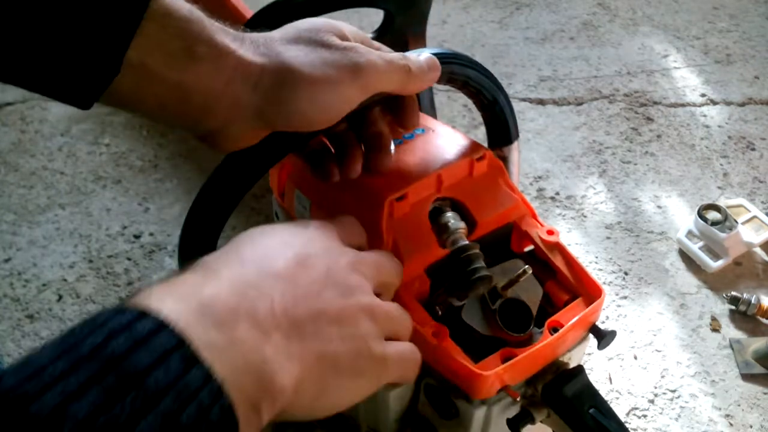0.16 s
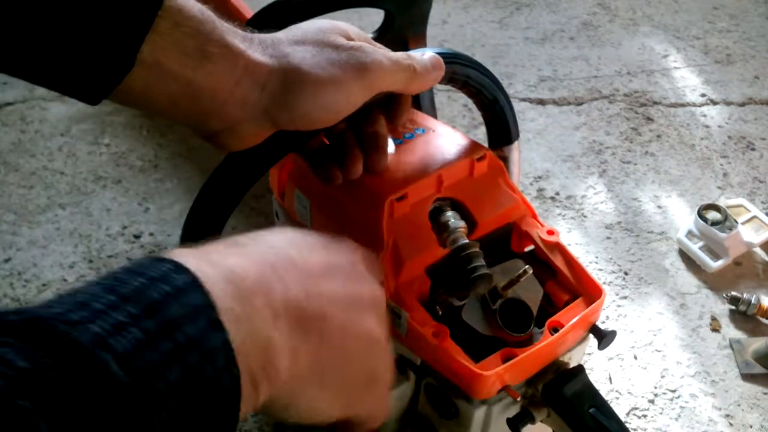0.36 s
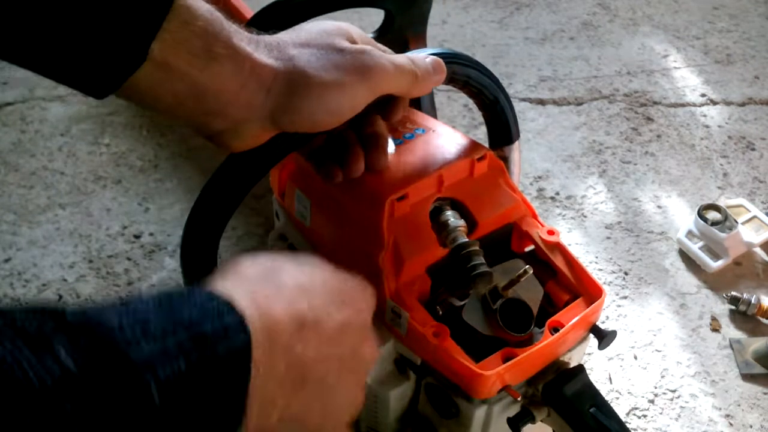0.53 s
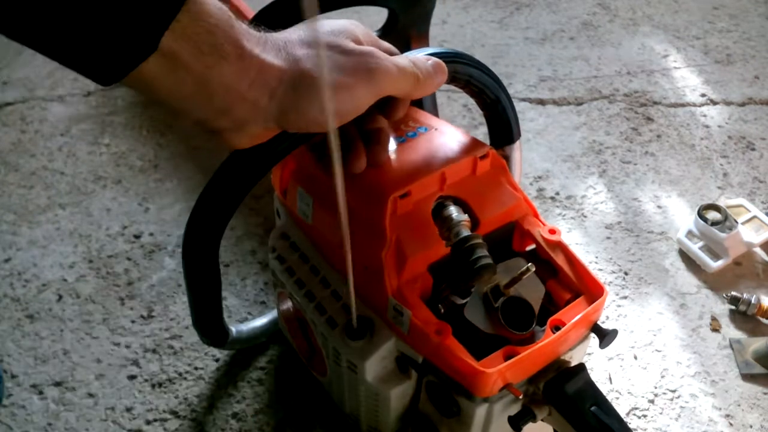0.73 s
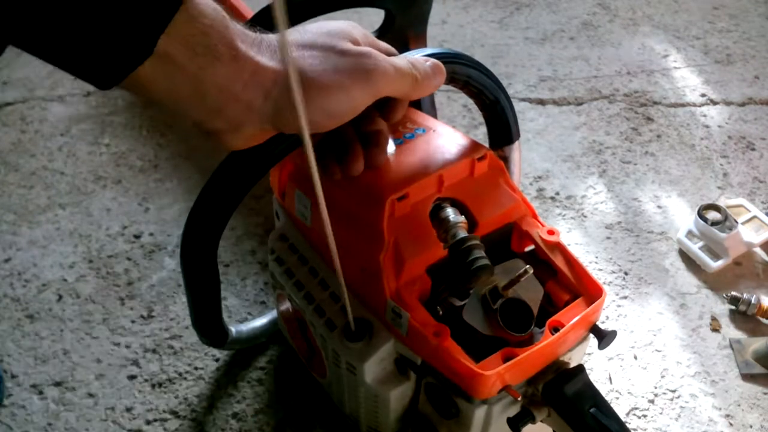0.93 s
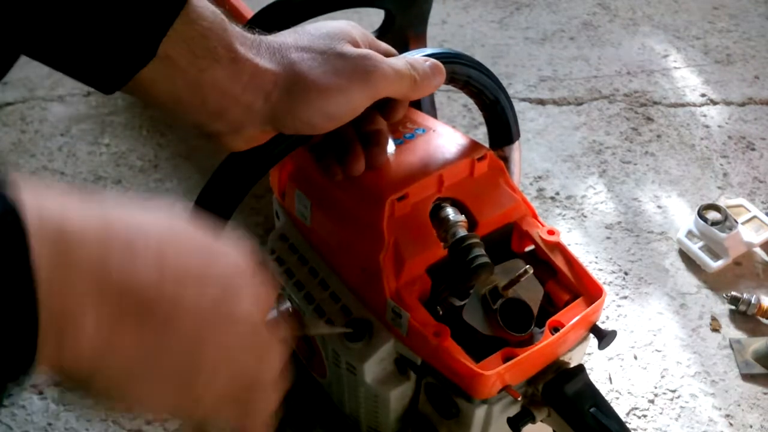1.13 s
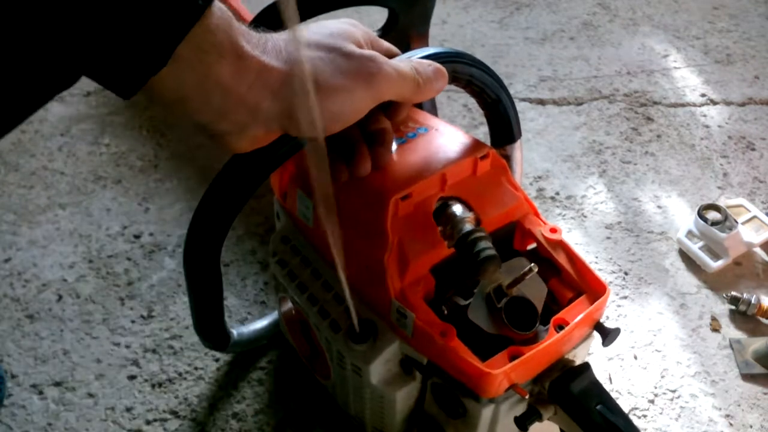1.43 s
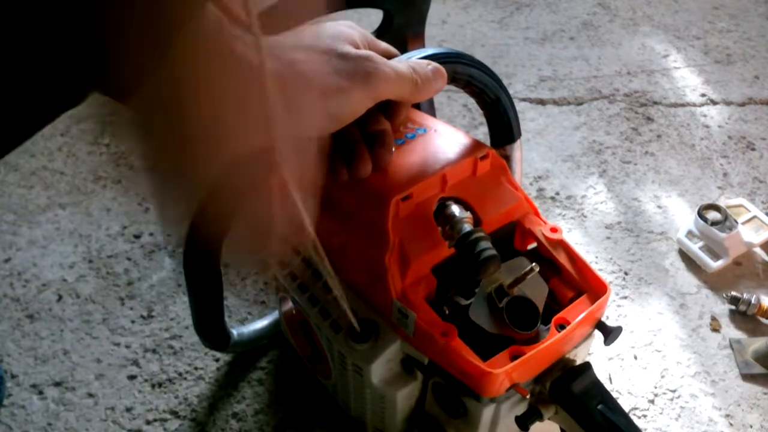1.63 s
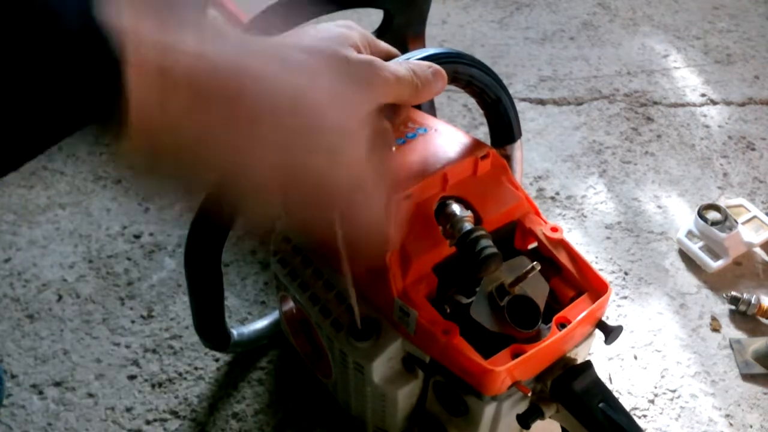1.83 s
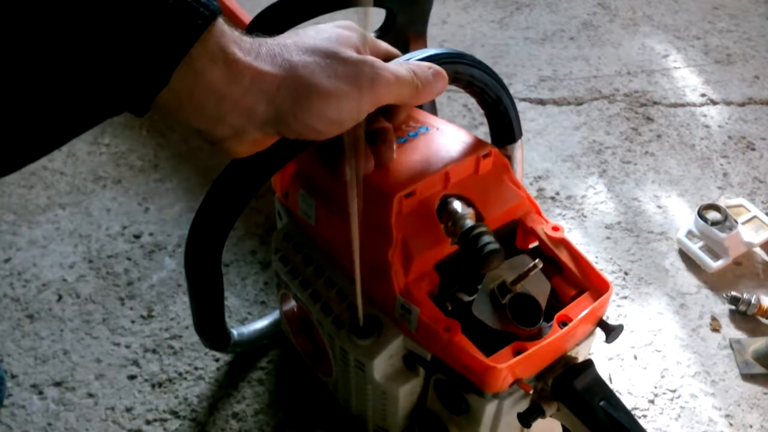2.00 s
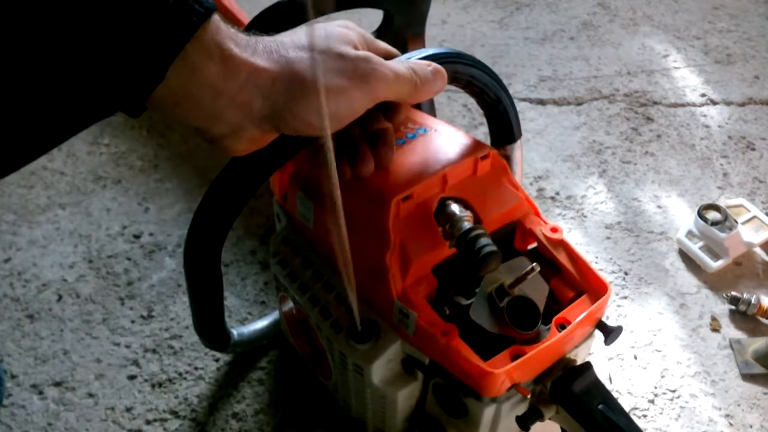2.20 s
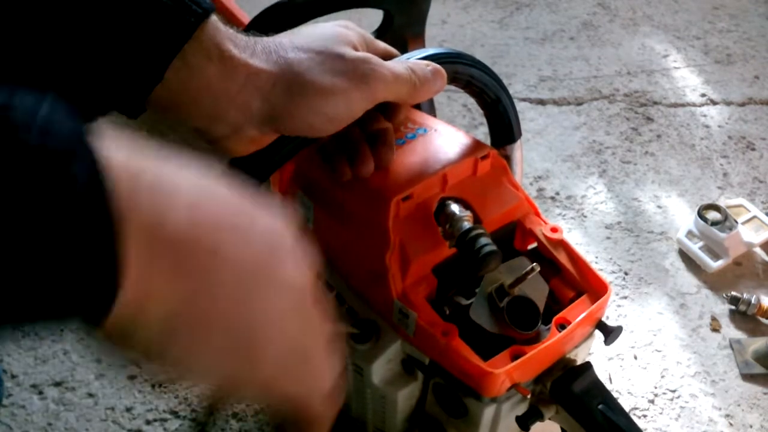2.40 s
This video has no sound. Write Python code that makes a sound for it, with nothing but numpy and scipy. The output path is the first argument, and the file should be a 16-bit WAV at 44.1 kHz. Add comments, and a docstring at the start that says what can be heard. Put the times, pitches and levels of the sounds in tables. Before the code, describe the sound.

Close up in a workshop, a hand grips a plastic saw case, then three fast cord pulls spin the engine with dull exhaust puffs, hollow knocks and hiss, ratchet ticks between them; it never starts.

```python
"""A hand takes hold of a small petrol saw in a workshop, scuffing and knocking its plastic case.
The starter cord is then pulled three times; the engine turns over without firing. The pawls first bite with a crack.
In each pull, gliding sines puff air through the silencer while ringing modes rattle and knock the case.
As the cord winds back, short bursts of impacts tick the pawls over the flywheel.
Coloured noise makes the scuffs, the cord and fan hiss, the low shake and the air; feedback delays make the room."""
import sys
import numpy as np
from scipy import signal
from scipy.fft import rfft, irfft, next_fast_len
from scipy.io import wavfile
from scipy.ndimage import uniform_filter1d

SR = 44100
rng = np.random.default_rng(int(sys.argv[2]) if len(sys.argv) > 2 else 0)


def put_to_file(sound):
    """Save the sound as 16-bit audio at rate SR, in the file named by the first command-line argument."""
    columns = np.atleast_2d(sound).T  # one column per channel
    safe = np.clip(columns, -1, 1)
    whole_steps = np.round(safe * 32767)
    wavfile.write(sys.argv[1], SR, whole_steps.astype(np.int16))


N = 112454


def from_db(db):
    """Amplitude factor of a level in dB."""
    return 10 ** (np.asarray(db) / 20)


def rms_one(x):
    """Scale to rms 1."""
    return x / np.sqrt(np.mean(x ** 2) + 1e-20)


def in_time(rows):
    """Table columns at every sample: -150 before the first row, the last value held after it."""
    s, *columns = np.transpose(rows)
    t = np.arange(N) / SR
    return [np.interp(t, s, c, left=-150, right=c[-1]) for c in columns]


def noise(spectrum):
    """Steady noise coloured by (pitch [Hz], level [dB per Hz]) points; rms 1."""
    hz = np.maximum(np.arange(N // 2 + 1) * SR / N, 1)
    points_hz, points_db = np.transpose(spectrum)
    gain = from_db(np.interp(np.log(hz), np.log(points_hz), points_db))
    return rms_one(irfft(rfft(rng.standard_normal(N)) * gain, N))


def flicker(rate_hz, depth_db):
    """A gain that wanders at random: low-passed noise, in dB."""
    r = np.exp(-2 * np.pi * rate_hz / SR)
    # the first second is dropped so the filter has settled
    slow = signal.lfilter([1], [1, -2 * r, r * r], rng.standard_normal(N + SR))[SR:]
    return from_db(depth_db * rms_one(slow))


def ring(clicks, hz, t60_s):
    """Two-pole resonator: a unit click starts a decaying sine of height 1."""
    r = from_db(-60 / (t60_s * SR))
    w = 2 * np.pi * hz / SR
    return signal.lfilter([0, np.sin(w)], [1, -2 * r * np.cos(w), r * r], clicks + 1e-18)


def impulses(s, db):
    """One click per time and level."""
    out = np.zeros(N)
    out[(np.asarray(s) * SR).astype(int)] = from_db(db)
    return out


def through(modes):
    """Broad colour that follows the modes and falls away on both sides."""
    return [(modes[0][0] / 3, -40)] + list(modes) + [(16000, modes[-1][1] - 30)]


def chatter(s, db, tilt_db, modes, t60_s, length_s, crack_db):
    """Each contact, a blow and a burst of tiny impacts, rings every mode by its own strength, and cracks."""
    t = np.arange(int(0.04 * SR)) / SR / length_s
    burst = (1 - np.exp(-8 * t)) * np.exp(-t)
    strength_db = db[:, None] + tilt_db + rng.normal(0, 2.5, (len(s), len(modes)))
    crack_envelope = signal.fftconvolve(impulses(s, db), burst)[:N]
    out = from_db(crack_db) * crack_envelope * noise(through(modes))
    for k, (hz, level_db) in enumerate(modes):
        blows = impulses(s, strength_db[:, k] + level_db)
        envelope = signal.fftconvolve(blows, burst)[:N]
        trail = envelope * rng.standard_normal(N) / np.sqrt(length_s * SR)
        out += (-1) ** k * ring(0.53 * blows + trail, hz, t60_s)
    low_cut = signal.butter(4, modes[0][0] * 0.78, "high", fs=SR, output="sos")
    return signal.sosfilt(low_cut, out)


# exhaust puffs, one a turn: (time [s], level [dB])
PUFFS = [(.8497, -19), (.9041, -18), (.9732, -25), (1.446, -19), (1.4969, -15), (1.5387, -15),
         (1.5841, -17.5), (1.6533, -26), (2.0922, -17), (2.1367, -13.5), (2.1725, -13.5), (2.2124, -15),
         (2.2665, -18.5)]
PUFF_START_HZ, PUFF_END_HZ, PUFF_GLIDE_S, PUFF_PEAK_S = 90, 350, .005, .005
ECHO_S, ECHO_DB = .016, -10


def puffs():
    """Each puff dips in pressure, then rings upward in pitch as the port opens; a wall returns it once."""
    t = np.arange(int(.04 * SR)) / SR
    hz = PUFF_END_HZ - (PUFF_END_HZ - PUFF_START_HZ) * np.exp(-t / PUFF_GLIDE_S)
    swell = (t / PUFF_PEAK_S * np.exp(1 - t / PUFF_PEAK_S)) ** 3
    puff = -swell * np.sin(2 * np.pi * np.cumsum(hz) / SR)
    direct = signal.fftconvolve(impulses(*np.transpose(PUFFS)), puff)[:N]
    echo = np.pad(direct, (int(ECHO_S * SR), 0))[:N]
    return direct + from_db(ECHO_DB) * echo


PORT_HZ, PORT_DB, PORT_LEAD_S = 990, -5, 0.002836  # level relative to the puff


def port():
    """The exhaust port rings as it opens, just ahead of each puff."""
    s, db = np.transpose(PUFFS)
    return ring(impulses(s - PORT_LEAD_S, db + PORT_DB), PORT_HZ, CASE_T60_S)


# knocks on the case, and two pawl ticks near 3.5 kHz, at 1.212 and 1.238 s:
# (time [s], level [dB], pitch that rings most [Hz])
KNOCKS_AND_PITCHED_TICKS = [(0.1359, -25.5, 1110), (0.4165, -34.5, 880), (0.7828, -16, 1790),
                            (0.827, -15, 1570), (0.8857, -13, 1600), (0.9459, -12, 1850),
                            (1.2119, -15.5, 3460), (1.238, -16.5, 3500), (1.351, -22.5, 974),
                            (1.419, -19, 1520), (1.483, -8, 1920), (1.628, -9, 1250), (2.025, -16.5, 1460),
                            (2.069, -13, 1570), (2.125, -38, 1040), (2.248, -20, 1550),
                            (2.262, -13.5, 1660)]
# modes of the plastic case: (pitch [Hz], level [dB])
CASE = [(600, -9), (810, -7), (1050, -3), (1250, -6), (1570, -3), (2120, -6.5), (2750, -17), (3460, -16.5),
        (4990, -17.5)]
CASE_T60_S = .022
KNOCK_S, KNOCK_FOCUS_DB_PER_OCT, KNOCK_CRACK_DB = 0.0042, 19, -22


def knocks_and_pitched_ticks():
    """Case modes near the pitch of each knock, or of the two pawl ticks, ring most."""
    s, db, pitch_hz = np.transpose(KNOCKS_AND_PITCHED_TICKS)
    octaves_off = np.abs(np.log2(pitch_hz[:, None] / np.array(CASE)[:, 0]))
    tilt_db = -KNOCK_FOCUS_DB_PER_OCT * octaves_off
    return chatter(s, db, tilt_db, CASE, CASE_T60_S, KNOCK_S, KNOCK_CRACK_DB)


# the other pawl ticks: (time [s], level [dB])
TICKS = [(1.0412, -32.5), (1.0722, -29), (1.1013, -30), (1.1292, -36), (1.1488, -24.5), (1.169, -30.5),
         (1.1871, -26.5), (1.281, -32), (1.3501, -33), (1.7653, -25), (1.7841, -25), (1.804, -31),
         (1.8246, -26.5), (1.8524, -24.5), (1.8812, -26.5), (2.007, -28.5), (2.0246, -25), (2.3568, -24.5),
         (2.4146, -28.5), (2.441, -27.5)]
# modes of the pawls: (pitch [Hz], level [dB])
PAWL = [(800, -11), (1130, -8.5), (2780, -8), (3460, -7), (4800, -8.5), (6300, -16.5), (10200, -23.5),
        (11600, -24)]
PAWL_T60_S, TICK_S, TICK_CRACK_DB = .015, .0035, -6


def ticks():
    """The pawls tick over the flywheel, ringing their own modes."""
    s, db = np.transpose(TICKS)
    return chatter(s, db, 0, PAWL, PAWL_T60_S, TICK_S, TICK_CRACK_DB)


# crack colour: (pitch [Hz], level [dB per Hz])
SNAP = [(900, -12), (6000, 0), (16000, -23)]
SNAP_S, SNAP_DB, SNAP_DECAY_S = .7803, -33, .0035


def snap():
    """The pawls first bite the flywheel: a hard, bright crack of decaying noise."""
    t = np.arange(N) / SR - SNAP_S
    return from_db(SNAP_DB) * (t > 0) * np.exp(-np.abs(t) / SNAP_DECAY_S) * noise(SNAP)


RATTLE_PER_S, RATTLE_SPREAD_DB, RATTLE_NOISE_DB = 1100, 4.5, -6


def rattle():
    """Loose parts tap the case at random, over rubbing noise; rms 1."""
    sizes_db = RATTLE_SPREAD_DB * np.minimum(rng.exponential(1, N), 4)
    sizes = from_db(sizes_db) * rng.choice([-1, 1], N)
    taps = sizes * (rng.random(N) < RATTLE_PER_S / SR)
    dealt = rng.random((len(CASE), N)) < .3  # each mode hears 30 % of the taps
    rings = sum(from_db(db) * ring(taps * dealt[k], hz, CASE_T60_S) for k, (hz, db) in enumerate(CASE))
    band = signal.butter(2, [350, 5000], "band", fs=SR, output="sos")
    rings = signal.sosfilt(band, rings)
    rub = from_db(RATTLE_NOISE_DB) * noise(through(CASE))
    return rms_one((rms_one(rings) + rub) * flicker(60, depth_db=2.5))


# motion of cord and crank: (time [s], case rattle level [dB], cord and fan hiss level [dB])
MOTION = [(.69, -86, -85), (.775, -50, -58), (.80, -49, -45), (.87, -31.5, -45), (.93, -32, -40.5),
          (.99, -41.5, -49), (1.04, -53.5, -52), (1.26, -50.5, -45), (1.335, -77, -61.5), (1.36, -54, -58),
          (1.47, -34, -42), (1.53, -25, -35.5), (1.6, -31.5, -36), (1.67, -42, -39.5), (1.73, -46.5, -44),
          (1.89, -47.5, -45.5), (1.975, -73, -66.5), (1.995, -38, -44), (2.06, -43, -47),
          (2.12, -26.5, -36), (2.2, -29.5, -35.5), (2.28, -31, -34.5), (2.34, -44.5, -38.5),
          (2.55, -55, -58)]
# cord and fan hiss colour: (pitch [Hz], level [dB per Hz])
HISS = [(400, -15.5), (2800, 10), (3460, 11), (4060, 8.5), (6410, 7), (8080, -6.5), (11000, -7.5),
        (15800, -37)]


def motion():
    """Cord and crank drive the case rattle and a flickering hiss of cord and fan."""
    rattle_db, hiss_db = in_time(MOTION)
    hiss = noise(HISS) * flicker(110, depth_db=2.2)
    return from_db(rattle_db) * rattle() + from_db(hiss_db) * hiss


# two tones from the cord in its eyelet, two from the rotor: # (start [s], length [s], start pitch [Hz], end
# pitch [Hz], level [dB])
SCRAPES = [(.713, .06, 1250, 750, -52), (1.375, .045, 1200, 1700, -45), (2.256, .036, 4850, 5050, -29),
           (2.26, .04, 6550, 6450, -37)]


def scrapes():
    """Narrow gliding tones, roughened by slow noise on their level."""
    out = np.zeros(N)
    rough = signal.lfilter([.03], [1, -.97], rng.standard_normal(N))
    for s, length_s, start_hz, end_hz, db in SCRAPES:
        i, n = int(s * SR), int(length_s * SR)
        phase = 2 * np.pi * np.cumsum(np.linspace(start_hz, end_hz, n)) / SR
        out[i:i + n] = from_db(db) * np.hanning(n) ** 0.3 * np.sin(phase)
    return out * (1 + .5 * rms_one(rough))


# shake colour: (pitch [Hz], level [dB per Hz])
RUMBLE = [(28, -8), (50, -17), (110, 10.5), (200, 12.5), (420, 6), (700, -60)]
SHAKE_DB, SHAKE_T60_S = -17, 0.24


def shake():
    """Each puff, and the hand's first grab, jolts the saw on the floor: low noise swells and dies away."""
    s, db = np.transpose(PUFFS + [KNOCKS_AND_PITCHED_TICKS[0][:2]])
    fade = from_db(-60 / (SHAKE_T60_S * SR))
    jolts = uniform_filter1d(np.roll(impulses(s, db), 200), size=400)  # each spread over 400 samples
    envelope = signal.lfilter([1], [1, -fade], jolts)
    return from_db(SHAKE_DB) * envelope * noise(RUMBLE)


# hand scuffs on the case: (time [s], level [dB])
GRIP = [(.134, -86), (.142, -55), (.2, -55), (.28, -58), (.35, -74.5), (.42, -65.5), (.48, -75),
        (.7, -72.5)]
# scuff colour: (pitch [Hz], level [dB per Hz])
GRIP_COLOUR = [(150, -14), (800, -6), (1500, -6.5), (3140, -17.5), (6500, -22.5), (9000, -40.5)]


def grip():
    """The hand scuffs on the case: flickering noise, cut at the last row."""
    grip_db, = in_time(GRIP)
    held = np.arange(N) < GRIP[-1][0] * SR
    return from_db(grip_db) * noise(GRIP_COLOUR) * flicker(35, depth_db=3.0) * held


ROOM_T60_S, ROOM_DB, WALL_CUT_HZ, PUFF_ROOM_DB = 0.23, -14, 2800, -10


def workshop(x):
    """Fourteen feedback delays, duller on every round."""
    size = next_fast_len(N + SR)
    hz = np.arange(size // 2 + 1) * SR / size
    wall = 1 / (1 + 1j * hz / WALL_CUT_HZ)
    response = 0
    for k, delay_s in enumerate(rng.uniform(.009, .04, size=14)):
        loop = from_db(-60 * delay_s / ROOM_T60_S) * wall * np.exp(-2j * np.pi * hz * delay_s)
        response = response + (-1) ** k * loop / (1 - loop)
    return irfft(rfft(x, size) * response, size)[:N]


# air colour: (pitch [Hz], level [dB per Hz])
AIR = [(40, -9), (300, -2), (800, -4.5), (2100, -5.5), (5990, -1), (7780, -18), (15800, -24)]
AIR_DB = -71


def air():
    """Steady background noise."""
    return from_db(AIR_DB) * noise(AIR)


def scene():
    """Saw and exhaust, dry and through the room, over the air."""
    exhaust = puffs()
    hits = port() + knocks_and_pitched_ticks() + ticks() + snap()
    saw = hits + motion() + scrapes() + shake() + grip()
    wet = from_db(ROOM_DB) * workshop(saw + from_db(PUFF_ROOM_DB) * exhaust)
    return (saw + exhaust + wet + air())[None]


MIC_LOW_CUT_HZ, CUTOFF_HZ = 51.5, 15900


def record(dry):
    """The microphone loses the deep bass; the top is cut."""
    low_cut = signal.butter(2, MIC_LOW_CUT_HZ, "high", fs=SR, output="sos")
    top_cut = signal.cheby2(14, 60, CUTOFF_HZ, fs=SR, output="sos")
    return signal.sosfilt(top_cut, signal.sosfilt(low_cut, dry))


dry = scene()
out = record(dry)
put_to_file(out)
```